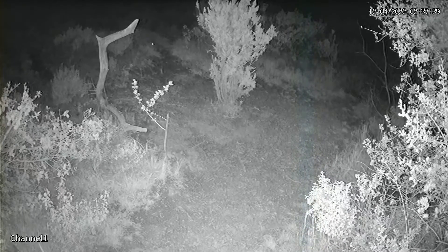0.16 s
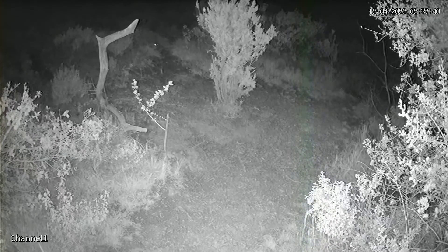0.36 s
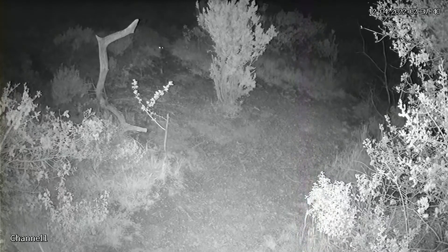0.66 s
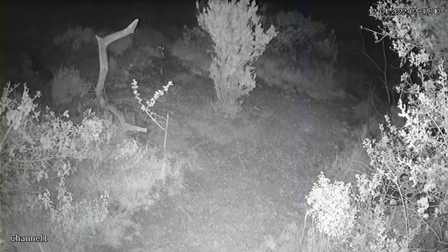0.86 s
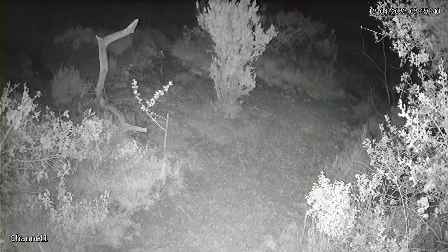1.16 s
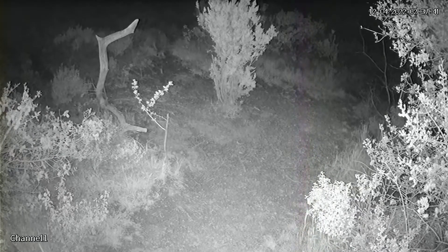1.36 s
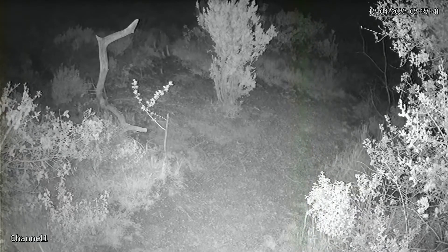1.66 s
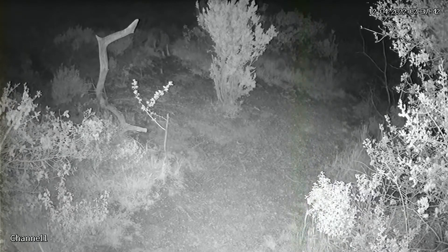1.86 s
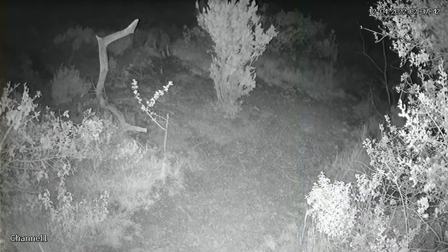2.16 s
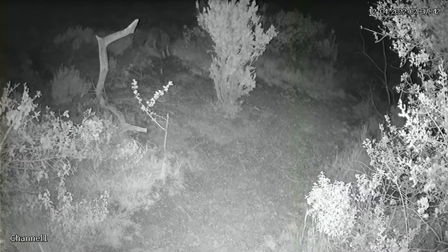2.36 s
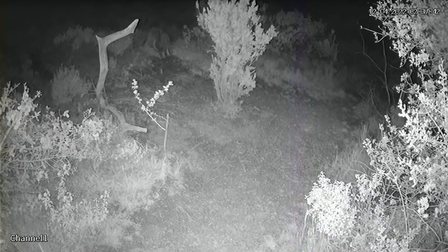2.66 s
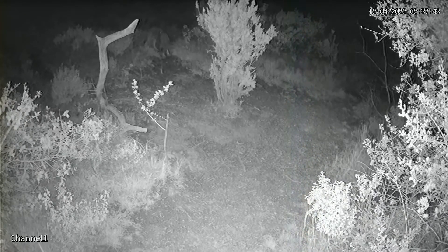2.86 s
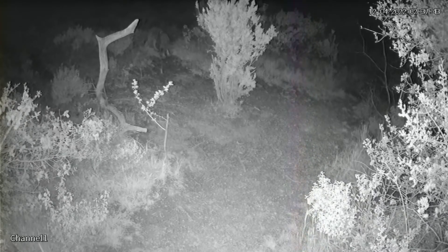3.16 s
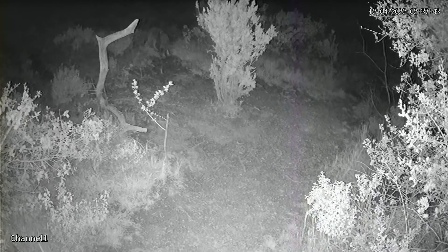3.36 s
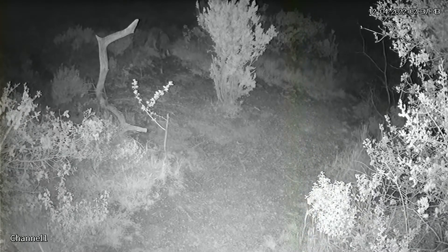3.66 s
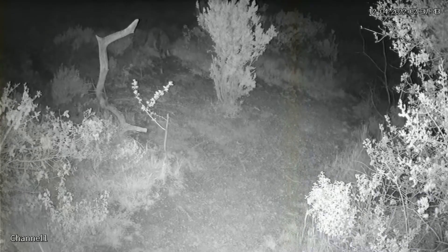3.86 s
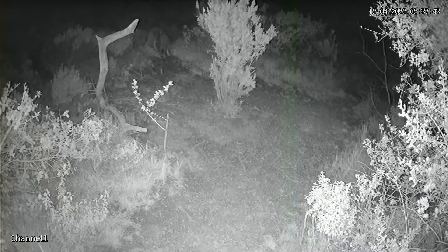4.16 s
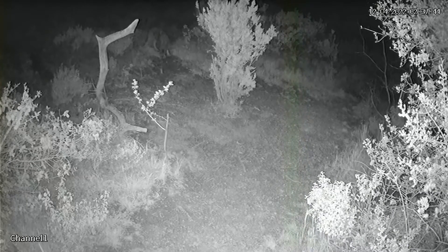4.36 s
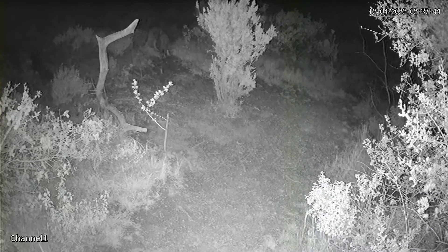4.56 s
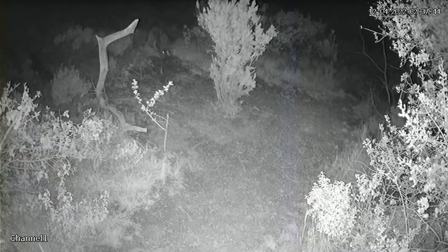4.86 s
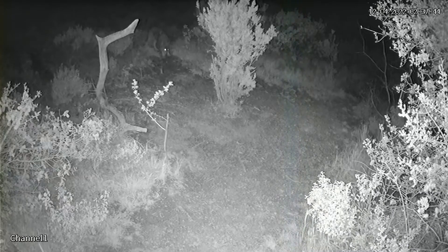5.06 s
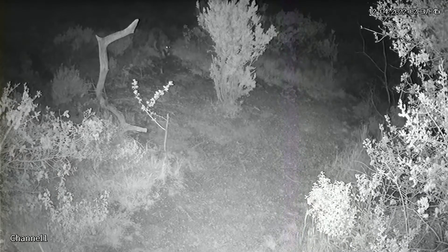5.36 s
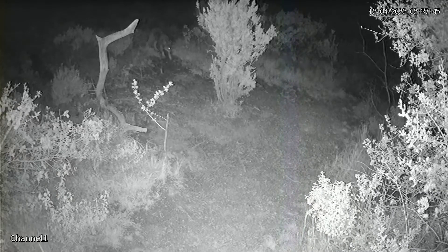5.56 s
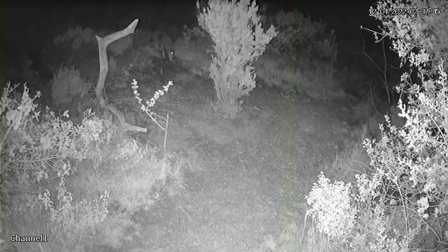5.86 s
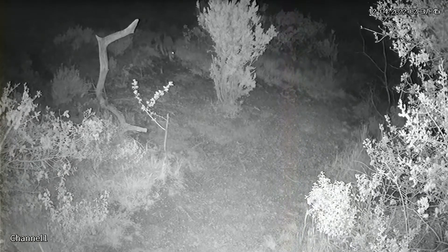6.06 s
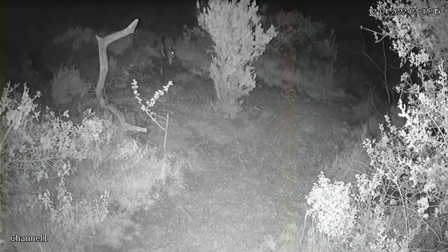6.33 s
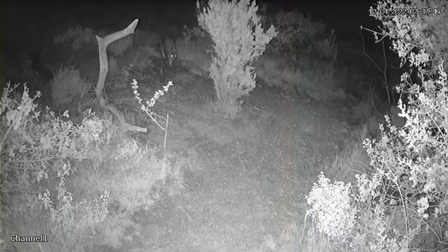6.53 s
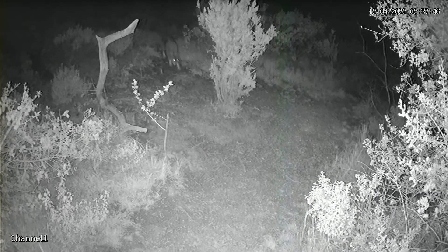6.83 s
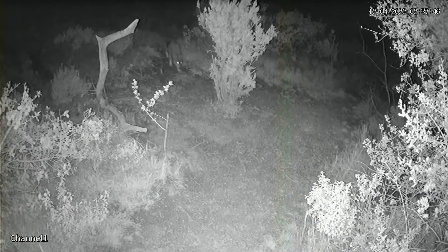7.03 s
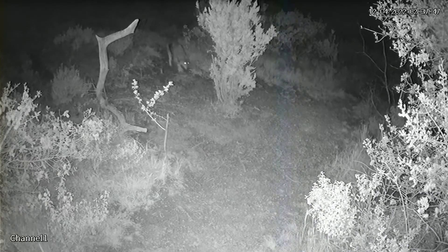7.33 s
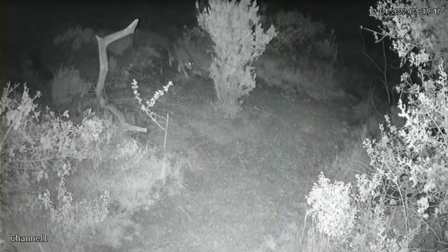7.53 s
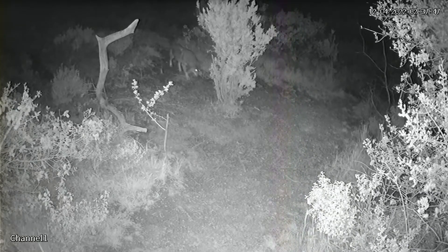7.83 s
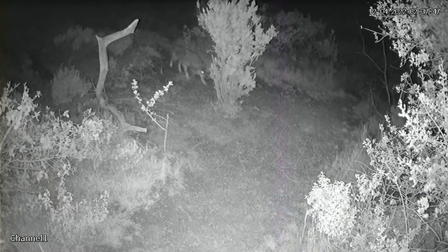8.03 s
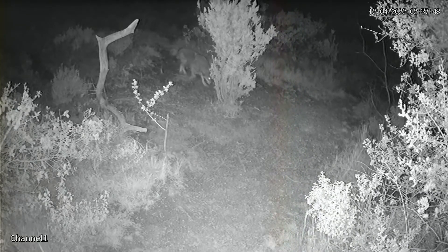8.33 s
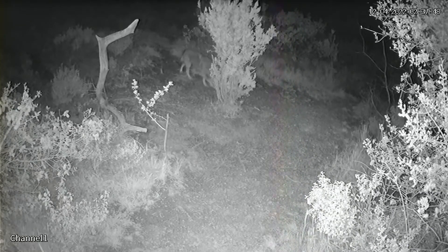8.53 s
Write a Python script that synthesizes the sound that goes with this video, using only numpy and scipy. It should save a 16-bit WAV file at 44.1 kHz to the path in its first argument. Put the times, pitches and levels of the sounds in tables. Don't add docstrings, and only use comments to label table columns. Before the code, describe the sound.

Night in open scrubland. A deep owl gives two soft, rounded hoots near the start, then only insects for over four seconds. A higher mate answers with six quicker hoots, two slurred together. Wide, high raspy insect song throbs constantly, with a barely audible far motor drone and low air noise beneath. Owls sit centred and clear, on a small outdoor stereo microphone with a dulled extreme top.

```python
import sys
import numpy as np
from scipy import signal
from scipy.fft import rfft, irfft, next_fast_len
from scipy.io import wavfile
from scipy.ndimage import uniform_filter1d

SR = 44100
rng = np.random.default_rng(int(sys.argv[2]) if len(sys.argv) > 2 else 0)


def digitize_waveform(pressure):
    field = np.atleast_2d(pressure).T
    bounded = np.clip(field, -1, 1)
    quanta = np.round(bounded * 32767).astype(np.int16)
    wavfile.write(sys.argv[1], SR, quanta)


def nominal_scale(level):
    x = np.asarray(level, float) / 20
    return 10 ** x


N = 383229


# start_s, pitch_hz
DEEP_HOOTS = [
    [(.55, 176), (.579, 265), (.616, 297), (.67, 306), (.76, 311), (.816, 310), (.845, 294.5), (.895, 281),
     (.95, 150)],
    [(1.272, 172), (1.308, 285), (1.334, 308), (1.36, 310), (1.47, 305), (1.509, 300), (1.538, 284),
     (1.557, 253), (1.593, 145)],
]
# strength_db, growth_db (start to end), swell_db (middle)
DEEP_LEVELS = [
    (-0.2, -1, 2.5),
    (-0.5, .8, 2.5),
]
# pitch_hz, fundamental_db, second_harmonic_db
DEEP_THROAT = [(150, -64, -52), (200, -55, -59.5), (260, -42.5, -56), (285, -37.5, -53.5),
               (299, -34, -53.5), (308, -32, -52.5), (314, -32.5, -53.5)]
# multiple, level_db (against the second harmonic)
DEEP_OVERTONES = [(3, -24.5), (4, -32)]
# start_s, pitch_hz
MATE_HOOTS = [
    [(6.035, 200), (6.053, 268), (6.072, 341), (6.087, 360), (6.114, 366), (6.149, 329), (6.195, 245),
     (6.245, 155)],
    [(6.413, 180), (6.437, 291), (6.455, 347), (6.475, 366), (6.499, 368), (6.52, 353), (6.558, 297),
     (6.612, 146)],
    [(6.618, 161), (6.641, 311), (6.653, 347), (6.672, 369), (6.694, 377), (6.725, 364), (6.755, 319),
     (6.765, 314)],
    [(6.765, 314), (6.775, 319), (6.807, 365), (6.845, 380), (6.905, 374), (6.938, 362), (6.967, 323),
     (6.991, 222), (7.012, 180)],
    [(7.311, 170), (7.344, 308), (7.368, 357), (7.404, 372), (7.459, 362), (7.55, 368), (7.597, 355),
     (7.636, 278), (7.669, 163)],
    [(7.775, 180), (7.803, 288), (7.828, 349), (7.855, 366), (7.888, 371), (7.959, 342), (7.986, 309),
     (8.021, 188), (8.042, 170)],
]
# strength_db, growth_db, swell_db
MATE_LEVELS = [
    (-1.6, -.3, .3),
    (-0.49, -.3, .3),
    (0, .3, .3),
    (0.19, -0.33, .3),
    (0.13, .3, .3),
    (0.24, .3, .3),
]
# pitch_hz, fundamental_db, second_harmonic_db
MATE_THROAT = [(150, -68.5, -68), (218, -55, -54.5), (262, -51, -56), (307, -43, -55.5),
               (345, -35.5, -56.5), (363.4, -31, -56), (380, -28.5, -60)]
# multiple, level_db
MATE_OVERTONES = [(3, -27), (4, -18.5)]


def owls():
    breath = nominal_scale(-39.5) * wander(200)
    flutter_db = 1.2 * wander(20)
    deep = owl(DEEP_HOOTS, DEEP_LEVELS, DEEP_THROAT, DEEP_OVERTONES, breath, flutter_db)
    mate = owl(MATE_HOOTS, MATE_LEVELS, MATE_THROAT, MATE_OVERTONES, breath, flutter_db)
    return deep + mate


def owl(hoots, levels, throat, overtones, breath, flutter_db):
    voice_hz, fade_s = 250, 0.013
    t, hz, gain = np.arange(N) / SR, np.zeros(N), np.zeros(N)
    for hoot, (db, growth_db, swell_db) in zip(hoots, levels):
        (start, first_hz), (end, last_hz) = hoot[0], hoot[-1]
        on = slice(int(start * SR), int(end * SR))
        hz[on] = glide(hoot, t[on])[0]
        since_start = t[on] - start + (first_hz > voice_hz)
        until_end = end - t[on] + (last_hz > voice_hz)
        fade = np.clip(np.minimum(since_start, until_end) / fade_s, 0, 1) ** 2
        along = 2 * (t[on] - start) / (end - start) - 1
        gain[on] = nominal_scale(db + growth_db * along / 2 - swell_db * along ** 2) * fade
    gain = uniform_filter1d(gain, size=300)
    phase = 2 * np.pi * np.cumsum(hz) / SR
    first_db = uniform_filter1d(track(throat, hz, column=1), size=400)
    second_db = uniform_filter1d(track(throat, hz, column=2), size=400)
    fundamental = (1 + breath) * np.sin(phase)
    effort_db = 0.45 * (first_db - first_db.max()) + 1.2 * flutter_db
    upper = sum(nominal_scale(db + effort_db) * np.cos(k * phase) for k, db in overtones)
    harmonics = upper - np.cos(2 * phase)
    return np.sqrt(2) * gain * (nominal_scale(first_db) * fundamental + nominal_scale(second_db + flutter_db) * harmonics)


def glide(table, t):
    s, *columns = np.array(table, float).T
    k = np.clip(np.searchsorted(s, t) - 1, 0, len(s) - 2)
    span = np.diff(s)[k]
    u = (t - s[k]) / span
    out = []
    for v in columns:
        slope = np.diff(v) / np.diff(s)
        before, after = np.r_[slope[0], slope], np.r_[slope, slope[-1]]
        tangent = 2 * np.maximum(before * after, 0) / (before + after + 1e-9)
        bend = (1 - u) * (tangent[k] - slope[k]) - u * (tangent[k + 1] - slope[k])
        out.append(v[k] + span * u * (slope[k] + (1 - u) * bend))
    return out


# throbs_per_s, first_peak_s, depth (0-1)
NEAR_SINGERS = [(3.8, 0.22, 0.07), (4.26, 0.017, 0.083), (4.5, 0.012, 0.09), (5.2, 0.11, 0.11),
                (5.48, 0.12, 0.058), (5.64, 0.056, 0.24), (6.32, 0.005, 0.062), (6.44, 0.11, 0.06),
                (7.12, 0.11, 0.082), (7.24, 0.14, 0.22), (7.4, 0.073, 0.14), (7.72, 0.094, 0.086)]
# freq_hz, left_db, right_db
NEAR_TINT = [(1000, 0, -1.5), (2160, -2, -5.5), (4400, 2, -4.5), (5980, -1.5, -5.5), (6970, 2, 2.5),
             (9650, -10.5, -2.5), (13000, -7.5, -6.5), (15000, -20.5, -9)]


def near_insects():
    rasp = strokes(217, ring_ms=1.0, drift=0.025, scatter_db=-1.5, blur=6.6, count=2)
    throb = throbs(NEAR_SINGERS, column=1, depth=1.2, sharp=0.53, uneven_db=0.59)
    return insects(NEAR_TINT, rasp * throb)


# throbs_per_s, first_peak_s, depth (0-1)
SHRILL_SINGERS = [(4.22, 0.1, 0.13), (4.56, 0.099, 0.11), (4.98, 0.021, 0.13), (5.2, 0.067, 0.18),
                  (5.5, 0.14, 0.22), (5.64, 0.046, 0.42), (5.88, 0.132, 0.16), (6.02, 0.085, 0.24),
                  (6.26, 0.116, 0.1), (6.46, 0.125, 0.25), (6.82, 0.005, 0.2), (7.04, 0.1, 0.14)]
# freq_hz, left_db, right_db
SHRILL_TINT = [(1000, -11, -5.5), (2000, -3, -13), (4140, -8.5, -14), (6000, -0.5, -6), (9500, -10, -5),
               (12000, -7.5, -4), (15000, -4, -1)]


def shrill_insects():
    rasp = strokes(220, ring_ms=0.99, drift=0.025, scatter_db=4.5, blur=2.9, count=2)
    throb = throbs(SHRILL_SINGERS, column=2, depth=1.14, sharp=0.68, uneven_db=0.76)
    return insects(SHRILL_TINT, rasp * throb)


# freq_hz, left_db, right_db
FAR_TINT = [(1000, 0.5, -6), (2000, -8.5, -4.5), (3770, -6.5, -9), (7000, -8, -8.5), (10500, -5, -6),
            (15000, -11.5, -13.5)]


def far_insects():
    return insects(FAR_TINT, np.ones(N))


def strokes(stroke_hz, ring_ms, drift, scatter_db, blur, count):
    power = np.zeros(N)
    for _ in range(count):
        cycles = rng.random() + np.cumsum(stroke_hz * (1 + drift * wander(8))) / SR
        sizes = nominal_scale(scatter_db * rng.standard_normal(N // 50))[cycles.astype(int)]
        ring = np.exp(-(cycles % 1) / (ring_ms * stroke_hz / 1000))
        power += (sizes * ring) ** 2
    return unit(np.sqrt(power / power.mean() + blur))


# start_s, near_power (ratio), shrill_power (ratio)
CHORUS_SWELL = [(0, 0.66, 0.81), (.8, 0.73, .78), (1.6, 0.84, 1), (2.6, 0.8, 0.79), (3.4, 0.76, 1.0),
                (4.2, 0.84, 1.2), (4.9, 0.7, .9), (5.6, 0.91, 0.71), (6.4, 0.83, 0.92), (7.3, 1.0, 1.16),
                (8.1, 1, 1), (8.7, 0.85, .64)]


def throbs(singers, column, depth, sharp, uneven_db):
    t = np.arange(0, N + 100, 100) / SR
    rate, first, share = np.array(singers, float).T[:, :, None]
    beats = np.sum(share * np.cos(2 * np.pi * rate * (t - first)), axis=0)
    power = track(CHORUS_SWELL, t, column) + depth * beats
    loud = np.logaddexp(0, 8 * power) / 8
    return np.interp(np.arange(N) / SR, t, loud ** sharp) * nominal_scale(uneven_db * wander(5))


# freq_hz, level_db (per Hz)
SONG_COLOUR = [(1000, -37.5), (1850, -33.5), (2350, -15.5), (3200, -16), (3750, -21), (4600, -1.5),
               (5800, -2), (6150, -8.5), (7900, -13), (8600, -17), (9300, -18), (9700, -22), (11500, -26),
               (14200, -38.5)]
# freq_hz, width_hz, level_db
WING_RESONANCES = [(2314, 63, 1), (4626, 59, 5), (5370, 350, 1.5), (5660, 45, 1), (7900, 170, 3),
                   (7440, 200, 0.5), (9600, 200, -4.5), (11000, 600, 2), (13600, 350, 5.5), (3900, 200, -2)]
# freq_hz, likeness (0-1), left_lag (radians)
MICROPHONES = [(500, 0.47, 0.74), (650, 0.62, 0.13), (2000, 0.21, 0.13), (3700, 0.31, 0.94),
               (4800, 0.21, 0.77), (5900, 0.7, 1.7), (8950, 0.43, 1.3), (9150, 0.3, .7),
               (12000, 0.6, 0.082), (15000, .6, 0.56)]


def insects(tint, envelope):
    common, *scattered = envelope * rng.standard_normal((3, N))
    alike = lambda hz: np.clip(track(MICROPHONES, hz), 0, 1)
    floor = lambda hz: 1 / (1 + (543 / hz) ** 5)
    peak = lambda hz, centre, width: 1 / (1 + (2 * (hz - centre) / width) ** 2)
    wings = lambda hz: nominal_scale(sum(db * peak(hz, centre, width) for centre, width, db in WING_RESONANCES))
    out = np.empty((2, N))
    for c in range(2):
        gain = lambda hz: colour(SONG_COLOUR, hz) * colour(tint, hz, column=c + 1) * floor(hz) * wings(hz)
        lag = lambda hz: np.exp((2 * c - 1) * 0.5j * track(MICROPHONES, hz, column=2))
        out[c] = shape(common, lambda hz: gain(hz) * np.sqrt(alike(hz)) * lag(hz))
        out[c] += shape(scattered[c], lambda hz: gain(hz) * np.sqrt(1 - alike(hz)))
    return out


# start_s, level_db
HUM_SWELL = [(0, -81), (.8, -82), (1.6, -87.5), (2.3, -88), (2.6, -90), (3.0, -79), (3.6, -89), (4.3, -79),
             (4.55, -96), (5.0, -80.5), (5.6, -85), (5.85, -88.5), (6.4, -77.5), (6.9, -92), (7.3, -80),
             (7.85, -84), (8.3, -86), (8.69, -77)]
# start_s, pitch_hz, level_db
WHINE_PATH = [(0, 212, -88), (1.7, 216.3, -85.5), (2.6, 211, -85), (3.5, 208.6, -83), (4.2, 209.6, -85.5),
              (4.5, 200.6, -87), (5.9, 196.8, -85), (7, 200, -88), (8.2, 226.7, -85), (8.69, 213, -97)]


def far_motor():
    t = np.arange(N) / SR
    hum = nominal_scale(track(HUM_SWELL, t)) * np.sin(2 * np.pi * 105 * t)
    whine_hz = track(WHINE_PATH, t) + 2.6 * wander(6.16)
    whine_db = track(WHINE_PATH, t, column=2) + 3.2 * wander(5)
    whine = nominal_scale(whine_db) * np.sin(2 * np.pi * np.cumsum(whine_hz) / SR)
    return np.sqrt(2) * (hum + whine)


# freq_hz, level_db (per Hz)
AIR_COLOUR = [(15, -8.5), (30, -9), (80, -3), (150, -3.5), (330, -3.5), (520, -8.5), (620, -8),
              (1000, -15.5)]
# freq_hz, width_hz, level_db
DRONE_BANDS = [(233, 8.7, -95), (246, 6, -92), (60, 3.7, -94.5), (477, 44, -87.5), (121, 8, -94)]


def night_air():
    air = nominal_scale(-75) * unit(shape(rng.standard_normal(N), lambda hz: colour(AIR_COLOUR, hz)))
    for centre, width, db in DRONE_BANDS:
        band = shape(rng.standard_normal(N), lambda hz: 1 / (1 + (2 * (hz - centre) / width) ** 2))
        air += nominal_scale(db) * unit(band)
    return air


def track(table, x, column=1):
    rows = np.array(table, float)
    return np.interp(x, rows[:, 0], rows[:, column])


def shape(x, gain):
    size = next_fast_len(N)
    hz = np.arange(size // 2 + 1) * SR / size + 0.00068
    return irfft(rfft(x, size) * gain(hz), size)[..., :N]


def colour(table, hz, column=1):
    rows = np.array(table, float)
    return nominal_scale(np.interp(np.log(hz), np.log(rows[:, 0]), rows[:, column]))


def unit(x):
    return x / np.sqrt(np.mean(x ** 2))


def wander(hz):
    return unit(shape(rng.standard_normal(N), lambda f: 1 / (1 + (f / hz) ** 2)))


def scene():
    song = near_insects() + shrill_insects() + far_insects()
    return nominal_scale(-36.5) * unit(song) + owls() + far_motor() + night_air()


# freq_hz, share (0-1)
DROPPED_PATCHES = [(300, 0), (500, .05), (1800, .08), (2050, .18), (2250, 0), (3550, 0), (3800, .2),
                   (4100, 0), (11000, 0), (12000, .08), (13000, .33), (14200, .48), (14600, .68),
                   (15200, .78)]


def thin_patches(x, patchy_db, masked_db, size=2048, count=7):
    frames = dict(nperseg=size, noverlap=size // 2, window="cosine")
    hz, _, cells = signal.stft(x, SR, **frames)
    power = uniform_filter1d(np.abs(cells.mean(axis=0)) ** 2, count, axis=0)[count // 2::count]
    centre = hz[count // 2::count, None]
    chance = rng.standard_normal((2,) + power.shape)
    held = chance[0] + np.roll(chance[0], 1, axis=1)
    rank = held.argsort(axis=1).argsort(axis=1) / held.shape[1]
    quiet = power < 4 * np.median(power, axis=1, keepdims=True)
    masked = quiet & (rank < 0.75)
    masked &= power < nominal_scale(masked_db) ** 2 * np.roll(power, 1, axis=0)
    keep = ~((quiet & (rank < track(DROPPED_PATCHES, centre))) | masked)
    gain = keep * nominal_scale(patchy_db * chance[1] * quiet)
    rows = np.minimum(np.arange(len(hz)) // count, len(power) - 1)
    return signal.istft(cells * gain[rows], SR, **frames)[1][:, :N]


def top_cut(x):
    return signal.sosfilt(signal.butter(12, 15620, fs=SR, output="sos"), x)


def record(dry):
    topped = shape(dry, lambda hz: hz < 15140)
    mix = thin_patches(topped, patchy_db=1.7, masked_db=-18)
    return top_cut(mix)


dry = scene()
out = record(dry)
digitize_waveform(out)
```